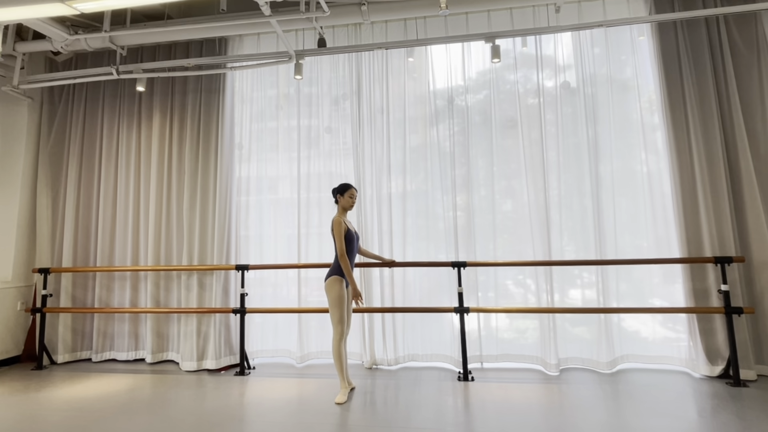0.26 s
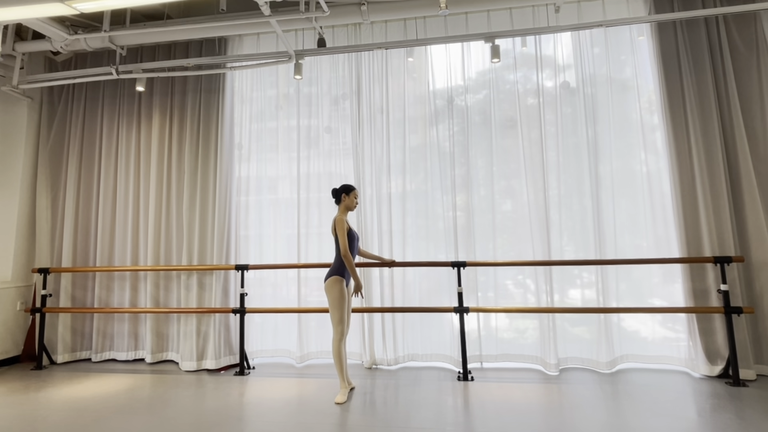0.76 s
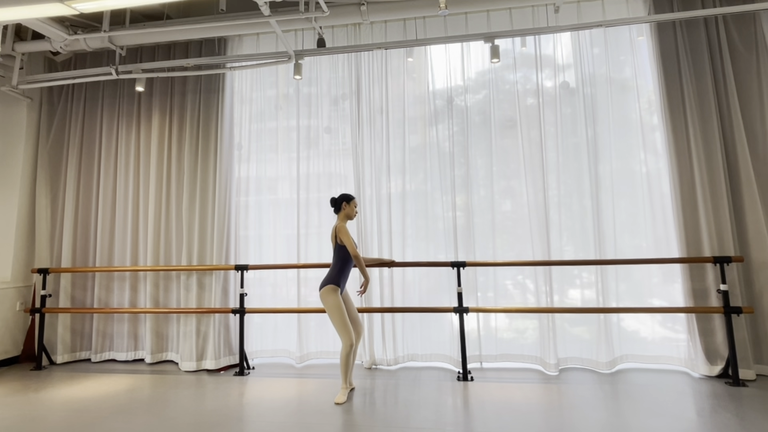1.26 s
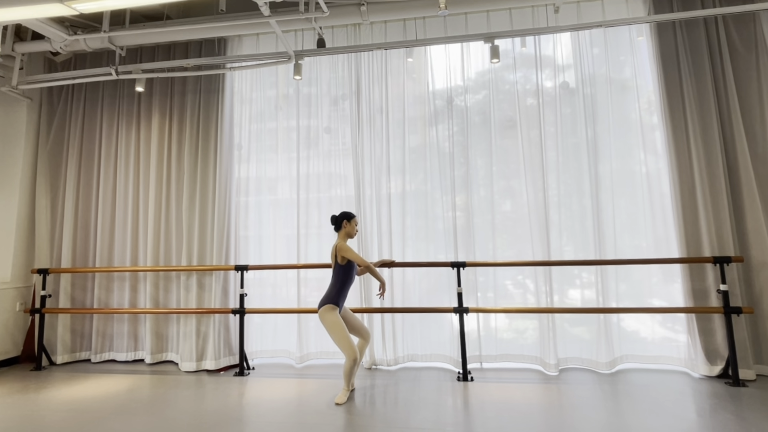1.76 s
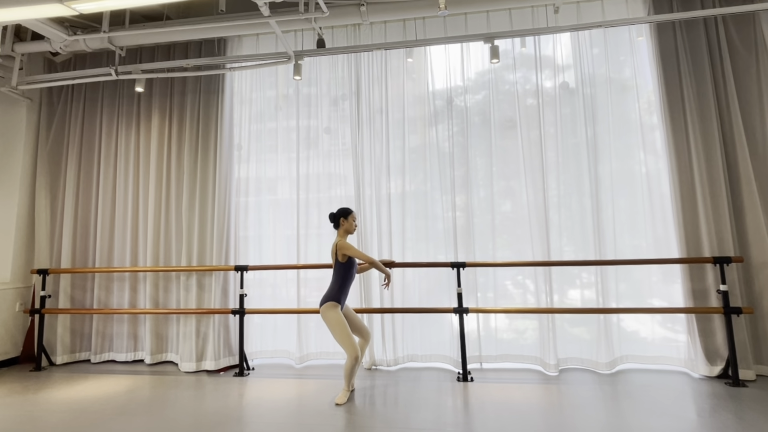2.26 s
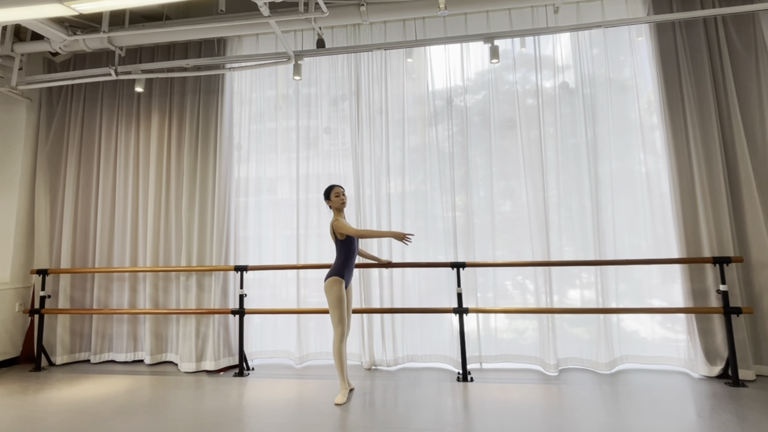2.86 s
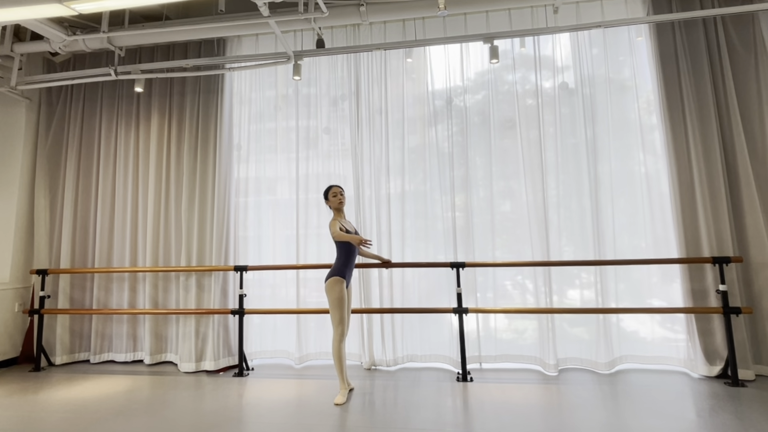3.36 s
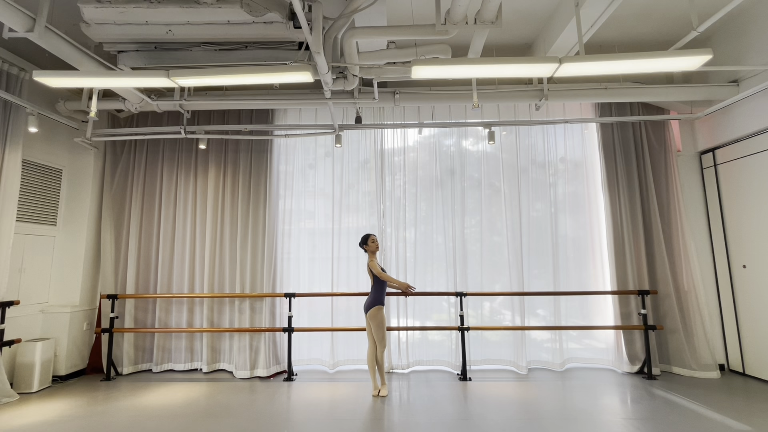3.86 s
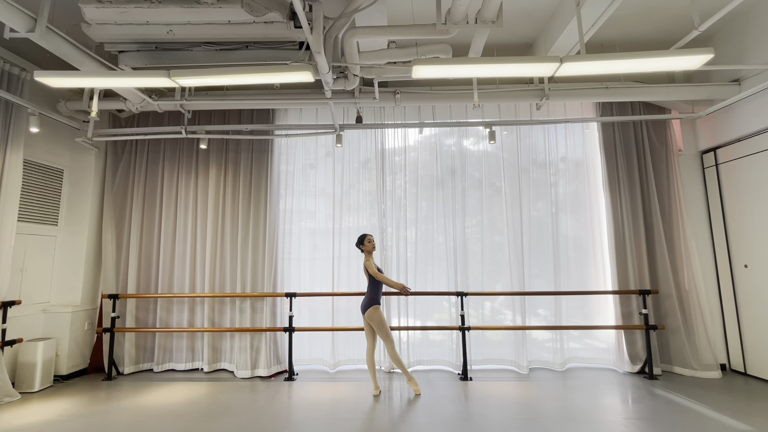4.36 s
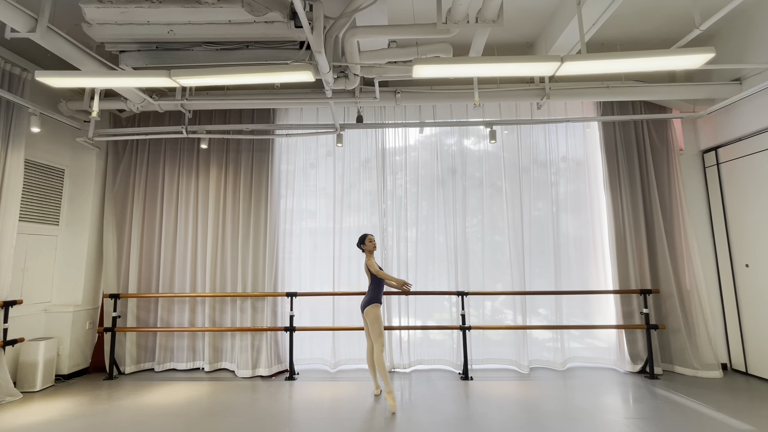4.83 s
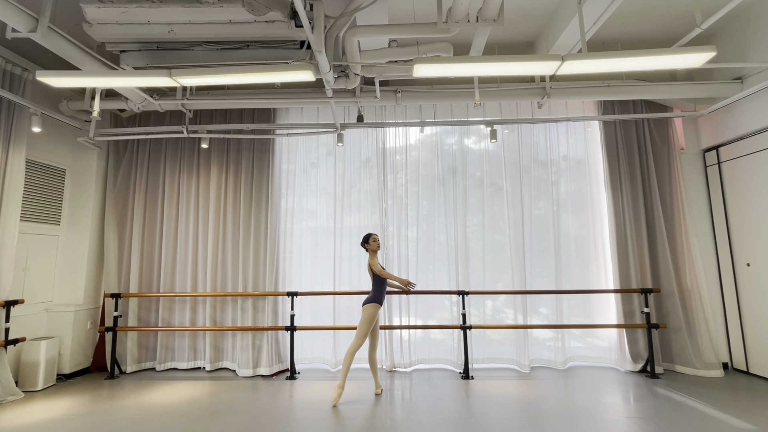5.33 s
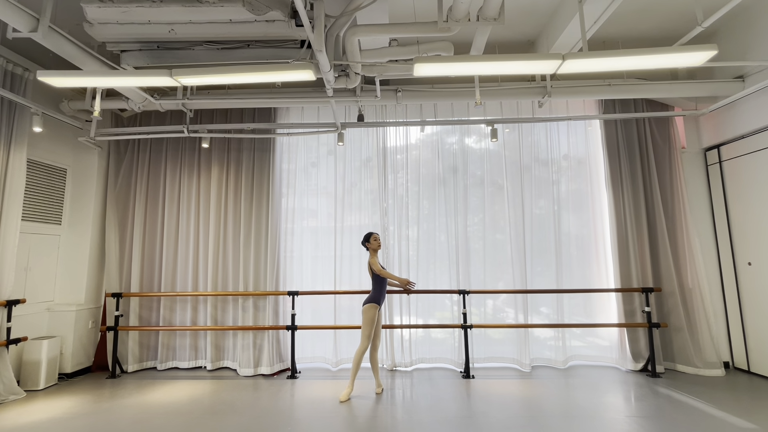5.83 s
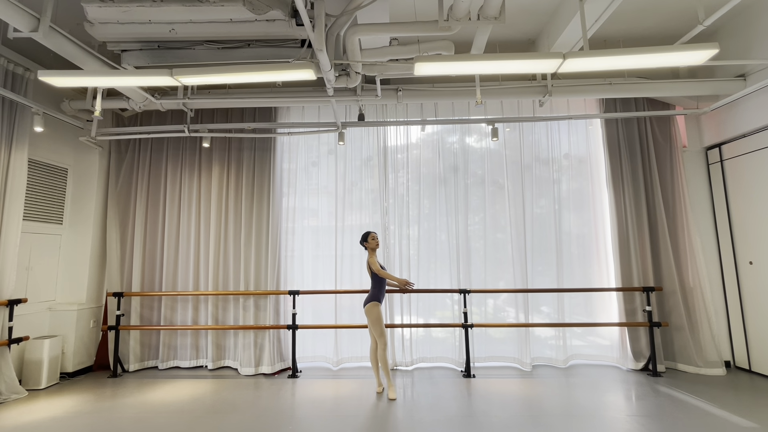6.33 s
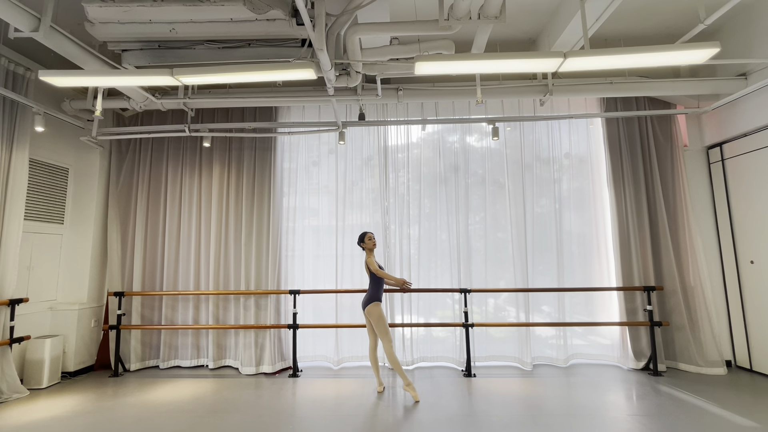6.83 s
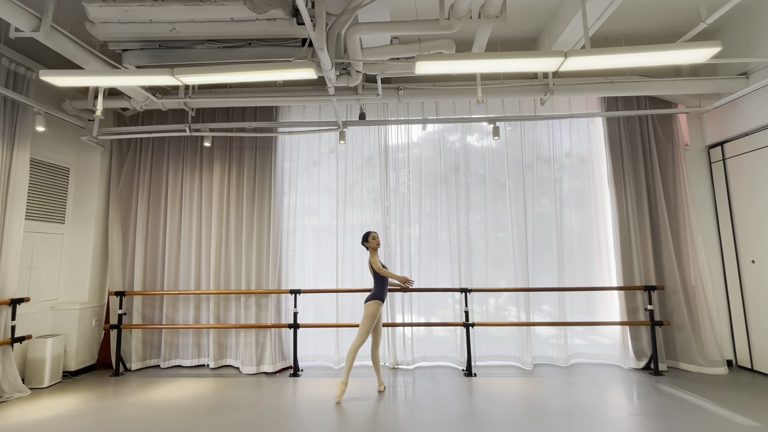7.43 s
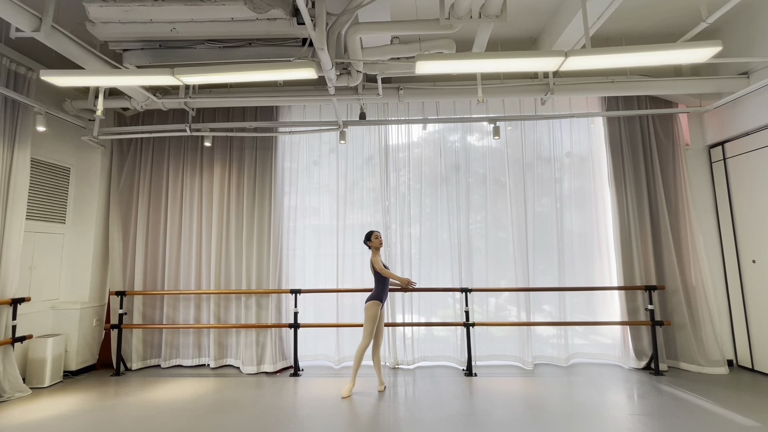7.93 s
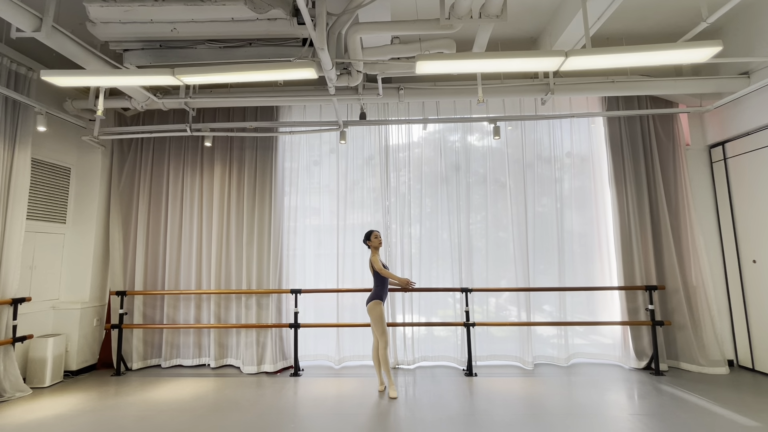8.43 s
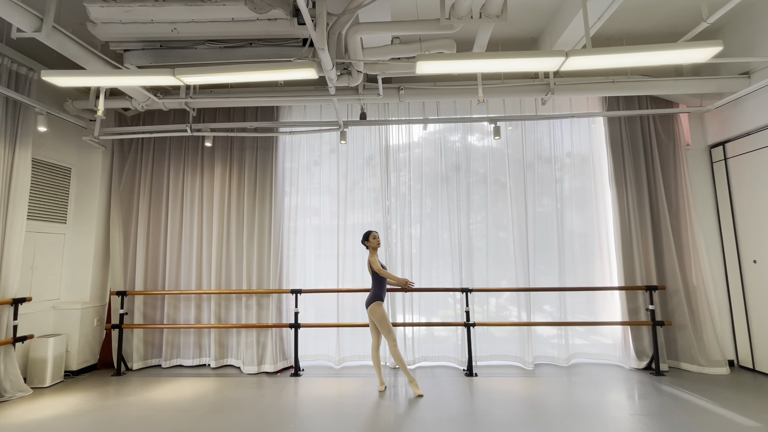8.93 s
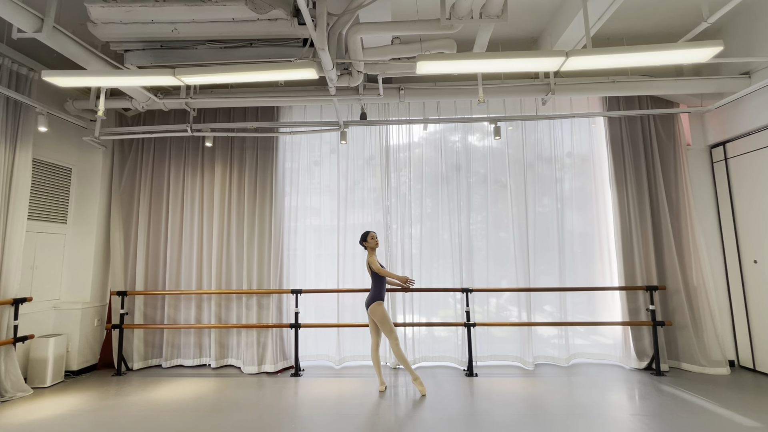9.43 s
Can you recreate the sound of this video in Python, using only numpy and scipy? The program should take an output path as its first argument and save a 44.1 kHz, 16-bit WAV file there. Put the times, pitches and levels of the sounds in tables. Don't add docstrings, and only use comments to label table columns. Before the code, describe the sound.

A microphone pressed to a dancer's chest picks up a slow, heavy heartbeat: a dull double thump, then a harder, sharply split snap that overloads. Low body rumble and dull handling bumps surround it. A very faint studio ventilation hiss stops abruptly around three seconds. Later, satin ballet shoes brush, drag and lightly tap on a vinyl floor a few metres away, quiet and airy beneath the heart.

```python
import sys
import numpy as np
from scipy import signal
from scipy.io import wavfile
from scipy.ndimage import uniform_filter1d

SR = 44100
rng = np.random.default_rng(int(sys.argv[2]) if len(sys.argv) > 2 else 0)


def store_pcm(level_fs):
    pcm = np.round(np.clip(level_fs, -1, 1) * 32767).astype(np.int16)
    wavfile.write(sys.argv[1], SR, np.atleast_2d(pcm).T)


def to_linear_factor(level_db):
    exponent = np.asarray(level_db, float) / 20
    return 10 ** exponent


N = 427329


def evened(x):
    return x / np.sqrt(np.mean(x ** 2) + 1e-20)


def read(points, hz):
    f, value = np.transpose(points)
    return np.interp(np.log(hz + 1), np.log(f + 1), value)


def hiss(spectrum, size, patch_db, flicker_db, colour=None):
    hop = size // 4
    frames = N // hop + 5
    hz = np.fft.rfftfreq(size, 1 / SR)
    real, imag, patches = rng.standard_normal((frames, len(hz), 3)).T
    patches = uniform_filter1d(patches, size=8, axis=0)
    patches = evened(uniform_filter1d(patches, size=10, axis=1))
    flicker = evened(uniform_filter1d(rng.standard_normal(frames), size=3))
    db = read(spectrum, hz)[:, None] + patch_db * patches + flicker_db * flicker
    plain = np.sqrt(np.mean(to_linear_factor(2 * db)))
    if colour:
        db = db + colour(hz[:, None], np.arange(frames) * hop / SR)
    x = signal.istft((real + 1j * imag) * to_linear_factor(db), nperseg=size, noverlap=size - hop)[1][:N]
    return x / (plain * np.sqrt(size))


def blows(rows, shape):
    glide, low_hz, rise_ms, late_ms, fall_ms = shape
    out = np.zeros(N)
    for s, db, hz in rows:
        near = slice(max(round((s - .05) * SR), 0), round((s + .14) * SR))
        u = (near.start + np.arange(len(out[near]))) / SR - s
        early = np.minimum(u + 2 / glide, 0)
        bend = (1 - np.exp(-glide * (u - early))) / glide + early * np.exp(2)
        turns = low_hz * u + (hz - low_hz) * bend
        ms = 1000 * u - late_ms
        swing = np.where(ms < 0, 1 / np.cosh(ms / rise_ms), np.exp(-(ms / fall_ms) ** 2))
        swing *= np.sin(np.pi / 2 * np.clip((u + .05) / .02, 0, 1)) ** 2
        out[near] -= to_linear_factor(db) * swing * np.cos(2 * np.pi * turns)
    return out


# (frequency [Hz], density [dB per Hz])
AIR = [(350, -30), (600, -4), (930, -11), (1500, -9), (1960, -6), (2600, -11), (3200, -22), (4000, -24),
       (6500, -21), (7300, -25), (8990, -16), (11200, -23), (13900, -21), (14800, -40)]


def air():
    level_db, stops_s = -84, 3.04
    steady = evened(hiss(AIR, size=512, patch_db=1.1, flicker_db=1.1))
    return to_linear_factor(level_db) * steady * (np.arange(N) < stops_s * SR)


# (frequency [Hz], density [dB per Hz])
RUMBLE = [(8.8, -67), (15, -29.5), (23, -8.5), (48, -5), (88, -6), (147, -11.5), (280, -18), (349, -25.5),
          (382, -28), (436, -36), (759, -50), (1380, -65.5), (3000, -77), (3900, -104), (6600, -120)]
# (time [s], level [dB])
RUMBLE_LEVEL = [
    (0, -54),
    (1.8, -54.5),
    (2.45, -50.5),
    (2.8, -55.5),
    (4., -53.5),
    (5.2, -55),
    (6., -54.),
    (7.5, -53),
    (8., -55.5),
    (9.69, -52.5),
]


def rumble():
    t = np.arange(N) / SR
    since = t - np.array(INLET_SHUTS)[:, :1]
    surge_db = (6.7 * np.exp(-np.abs(since) / 0.14) * np.clip(since / 0.0035, 0, 1)).sum(axis=0)
    level_db = np.interp(t, *np.transpose(RUMBLE_LEVEL)) + surge_db
    return to_linear_factor(level_db) * evened(hiss(RUMBLE, size=2048, patch_db=2.5, flicker_db=2.0))


# (time [s], level [dB], pitch [Hz], fall [ms])
BUMPS = [(.006, -46, 108, 7.2), (1.277, -41.5, 105, 17), (1.931, -42, 148, 4.3), (1.977, -37.5, 104, 13.5),
         (2.094, -40.5, 112, 21), (2.161, -52, 110., 19), (2.362, -25.5, 104, 32), (3.103, -42, 109, 27),
         (4.695, -34, 98, 15.4), (5.004, -24.5, 97.3, 9.3), (5.179, -38, 110., 9.8), (5.877, -42, 70.5, 14),
         (5.907, -37.5, 87, 28), (8.369, -33, 116, 9.3), (9.280, -32, 109, 17), (9.5291, -29.5, 181, 10.7),
         (0.451, -36.5, 89, 16), (2.356, -35, 186, 3), (4.681, -41, 119, 4.8), (8.354, -38, 182, 2.1),
         (4.993, -34.5, 99, 8.9), (9.676, -26.5, 97, 13)]
# (pitch fall [1/s], lowest pitch [Hz], rise [ms], loudest after [ms])
BUMP_SHAPE = (90., 48., 2.2, -1.)
# (time [s], level [dB], pitch [Hz])
TICKS = [
    (2.153, -54.5, 380),
    (3.092, -67.5, 600),
    (6.686, -57.5, 850),
    (8.118, -59, 910),
    (8.361, -47.5, 320),
    (8.575, -56, 666),
    (9.253, -54.5, 635),
    (9.265, -49, 600),
]
# (pitch fall [1/s], lowest pitch [Hz], rise [ms], loudest after [ms], fall [ms])
TICK_SHAPE = (190, 100, 0.78, 0.69, 30)


def hand():
    bumps = sum(blows([(s, db, hz)], (*BUMP_SHAPE, fall_ms)) for s, db, hz, fall_ms in BUMPS)
    return bumps + blows(TICKS, TICK_SHAPE)


# (time [s], level [dB], ring [Hz])
TOE_TAPS = [
    (5.076, -75, 3600.),
    (5.225, -72, 1600.),
    (6.925, -64, 1110),
    (7.13, -64, 650),
    (8.118, -68, 2000.),
    (8.275, -67, 910),
    (8.275, -64, 5000.),
    (8.753, -60, 780),
    (8.753, -61, 2700.),
    (9.288, -66, 1500.),
]


def toe():
    rise_s, fall_s, spread = .0015, .006, 1.2
    out, t = np.zeros(N), np.arange(0, .04, 1 / SR)
    grit = rng.standard_normal((len(TOE_TAPS), len(t)))
    for (s, db, hz), noise in zip(TOE_TAPS, grit):
        band = signal.butter(2, [hz / spread, hz * spread], "band", fs=SR, output="sos")
        ring = signal.sosfilt(band, noise)
        puff = evened(ring) * np.minimum(t / rise_s, 1) * np.exp(-t / fall_s)
        out[round((s - rise_s) * SR):][:len(t)] += to_linear_factor(db) * puff
    return out


# (frequency [Hz], density [dB per Hz])
BRUSH = [(410, -10.5), (700, -3.5), (851, -44), (932, -4.5), (1240, -8.5), (1790, -8.5), (2350, -10.5),
         (7270, -2.5), (10100, -10), (12400, -11.5), (14500, -7), (15700, -10)]
# (fastest at [s], half length [s], speed [dB], weight [dB], sheen [dB])
STROKES = [(4.387, 0.087, -81.5, -14, -11), (4.595, 0.15, -74.5, -12.5, -11), (4.818, 0.22, -80, -7, -13.5),
           (5.047, 0.087, -77.5, -8, -18), (5.218, 0.045, -87, 0, -6), (5.444, 0.4, -83.5, -5, -10.5),
           (5.885, 0.11, -77.5, -9, -12), (6.088, 0.15, -77, -4, -7.5), (6.22, 0.094, -76.5, -5.5, -6),
           (6.49, 0.19, -70, -9, -7), (6.764, 0.055, -74, -13, -15.5), (6.863, 0.12, -76.5, -5.5, -17),
           (7.292, 0.47, -82, -2, -7.5), (7.885, 0.11, -76, -9, -12), (8.095, 0.13, -73, -2.5, -8),
           (8.32, 0.11, -68, -10, -10.5), (8.563, 0.26, -72.5, -6.5, -9.5), (8.794, 0.1, -69.5, -17, -6),
           (8.927, 0.037, -67.5, -23, -13), (9.09, 0.23, -69, -9.5, -11.5), (9.294, 0.037, -68.5, -17, -4),
           (9.4, 0.077, -67.5, -13.5, -7.5), (9.545, 0.066, -67.5, -10.5, -10.5),
           (9.7, 0.061, -68.5, -5.5, -14)]
# (time [s], drop [dB], lift-off [s], landing [s])
LIFTS = [
    (4.92, -4, 0.018, 0.056),
    (5.69, -8.5, 0.086, 0.035),
    (6.81, -5, .02, 0.021),
    (7.61, -6, .06, 0.058),
    (8.655, -9, 0.025, 0.017),
    (9.275, -10.5, 0.1, 0.01),
    (9.635, -4.5, 0.027, 0.01),
]
# (time [s], half length [s], ring [Hz], boost [dB])
DRAGS = [(4.93, 0.065, 2310, 13), (5.07, 0.067, 3500, 6), (5.19, 0.034, 1900, 8.5), (5.95, 0.079, 2700, 4),
         (6.085, 0.087, 2240, 8.5), (6.81, 0.072, 2060, 10.5), (6.927, 0.099, 3420, 5),
         (7.136, 0.067, 2000, 7), (8.043, 0.092, 2100, 6), (8.373, 0.046, 3200, 1.5), (9.0, 0.056, 2090, 5),
         (9.343, 0.027, 2170, 7)]


def shoes():
    edge_db, squareness = -4.5, 1.97
    sole_width = .2

    def colour(hz, t):
        low = 1 / (1 + (hz / 3800) ** 4)
        high = 1 / (1 + (10200 / (hz + 1)) ** 12)
        power = 1e-14
        for s, half, speed_db, weight_db, sheen_db in STROKES:
            tone = to_linear_factor(2 * (low * (weight_db + 11.5) + high * (sheen_db + 6.0)))
            stroke_db = speed_db + edge_db * np.abs((t - s) / half) ** squareness
            power = power + tone * to_linear_factor(2 * stroke_db)
        lifted_db = sum(db * np.exp(-((t - s) / np.where(t < s, off, on)) ** 2) for s, db, off, on in LIFTS)
        sole_db = sum(db * np.exp(-((t - s) / half) ** 2 - ((hz / ring_hz - 1) / sole_width) ** 2)
                      for s, half, ring_hz, db in DRAGS)
        return 10 * np.log10(power) + (1 - .5 * low + .3 * high) * lifted_db + sole_db

    return to_linear_factor(7.5) * hiss(BRUSH, size=256, patch_db=1.15, flicker_db=1.02, colour=colour)


# (time [s], level [dB], pitch [Hz])
INLET_SHUTS = [(0.4346, -26.7, 80), (1.3439, -23.5, 80), (2.2689, -24.1, 80), (3.1989, -24.4, 77),
               (4.1411, -26.2, 72), (4.975, -30.1, 85), (5.8025, -24.3, 80), (6.7043, -23.7, 81),
               (7.6701, -23.9, 80), (8.6673, -24.5, 77), (9.6582, -26.3, 80)]
# (time [s], level [dB], pitch [Hz])
WALL_TENSES = [
    (0.4795, -34.8, 48),
    (1.3861, -27.1, 70),
    (2.3111, -27.0, 70),
    (3.2413, -26.4, 71),
    (4.1847, -25.4, 69),
    (5.023, -28.0, 47),
    (5.8439, -25.5, 70),
    (6.7457, -26.9, 71),
    (7.7117, -26.5, 70),
    (8.7096, -27.5, 69),
]
# (time [s], level [dB], pitch [Hz])
OUTLET_SHUTS = [
    (0.7729, -18.7, 98),
    (1.695, -18.3, 98),
    (2.6219, -17.6, 98),
    (3.5503, -17.5, 96),
    (4.4889, -17.5, 96),
    (5.3173, -18.0, 99),
    (6.156, -18.7, 100),
    (7.0638, -18.4, 100),
    (8.0319, -18.1, 101),
    (9.0284, -18.1, 98),
]
# (time [s],
# level [dB], pitch [Hz])
LUNG_VALVE_SHUTS = [(0.0247, -27.6, 65), (0.8505, -25.7, 64), (1.7554, -26.8, 63), (2.6792, -27.6, 60),
                    (3.6113, -27.6, 62), (4.5649, -26.4, 64), (5.3971, -24.1, 59), (6.2216, -25.6, 61),
                    (7.1173, -25.3, 61), (8.0852, -26.0, 57), (9.0854, -28.0, 58), (9.5579, -29.9, 65)]
# (pitch fall [1/s], lowest pitch [Hz], rise [ms], loudest after [ms], fall [ms])
INLET_SHAPE = (108., 33.4, 3.2, -1.4, 45.)
WALL_SHAPE = (30., 52.3, 15., -10., 23.5)
OUTLET_SHAPE = (120., 51.4, 1.2, 1.3, 25.5)
LUNG_VALVE_SHAPE = (110., 48.7, 5.6, -1.7, 16.7)
LEAFLET_SHAPE = (30., 70., 6., -1., 6.)
FLUTTER_SHAPE = (77, 82, 3, 1.4, 7.6)


def heart():
    late_leaflet = [(s + .018, db - 8., 1.15 * hz) for s, db, hz in INLET_SHUTS]
    first = blows(INLET_SHUTS, INLET_SHAPE) + blows(WALL_TENSES, WALL_SHAPE)
    first = first + blows(late_leaflet, LEAFLET_SHAPE)
    second = blows(OUTLET_SHUTS, OUTLET_SHAPE) + to_linear_factor(-1.1) * blows(LUNG_VALVE_SHUTS, LUNG_VALVE_SHAPE)
    flutter = [(s - .0055, db - 22., 2.6 * hz) for s, db, hz in OUTLET_SHUTS]
    flutter += [(s - .009, db - 17.5, 2.1 * hz) for s, db, hz in INLET_SHUTS]
    flutter += [(s - .022, db - 13.5, 3.15 * hz) for s, db, hz in LUNG_VALVE_SHUTS]
    return to_linear_factor(0.82) * first + second + blows(flutter, FLUTTER_SHAPE)


def scene():
    overload = .0565
    chest = np.clip(heart() + hand() + rumble(), -overload, overload)
    chest = signal.lfilter(*signal.butter(1, 5000, fs=SR), chest)
    return (chest + air() + shoes() + toe())[None]


def band_limit(x):
    return signal.sosfilt(signal.butter(12, 15820, fs=SR, output="sos"), x)


def record(dry):
    ends = signal.windows.tukey(N, .005 * SR / N)
    converter_noise = to_linear_factor(-101.) * rng.standard_normal(dry.shape)
    return band_limit(dry * ends + converter_noise)


dry = scene()
out = record(dry)
store_pcm(out)
```